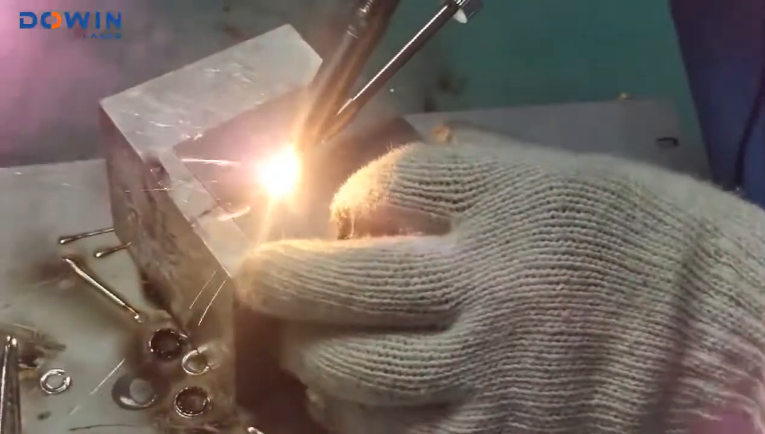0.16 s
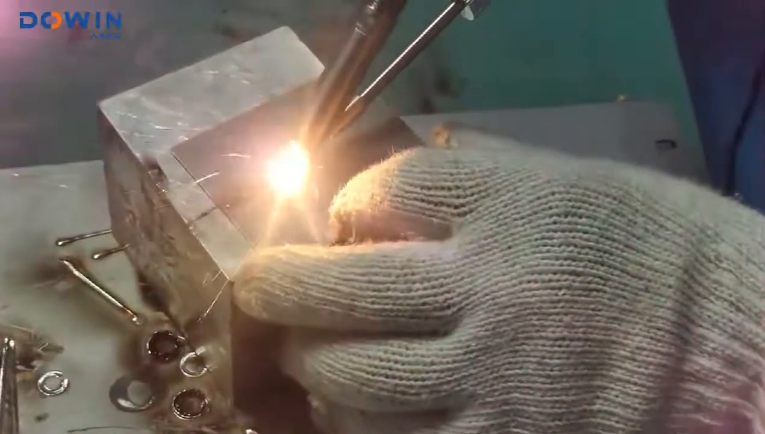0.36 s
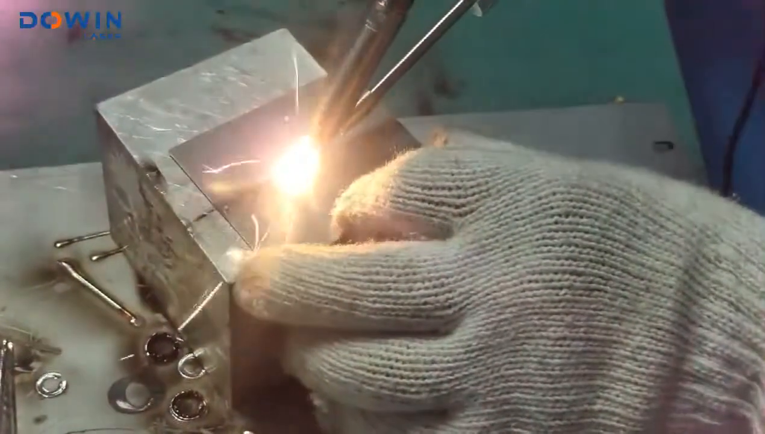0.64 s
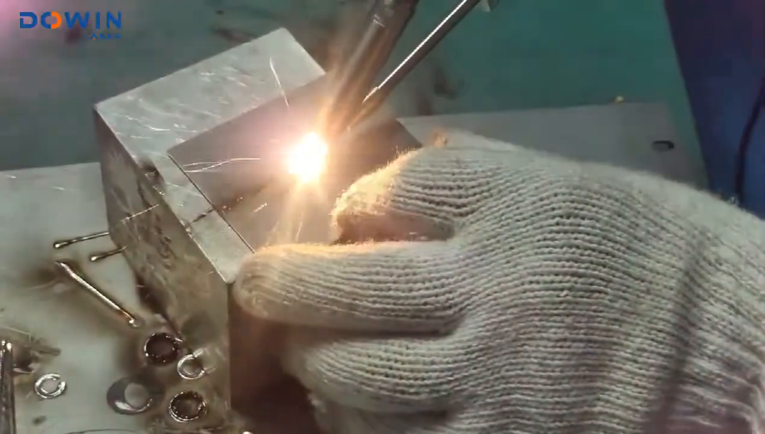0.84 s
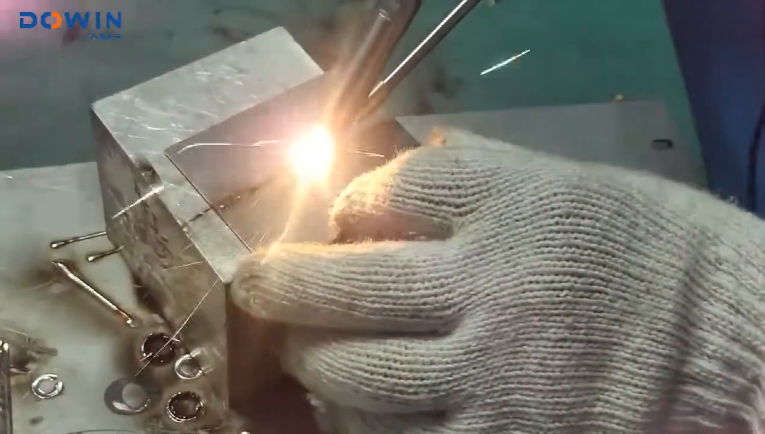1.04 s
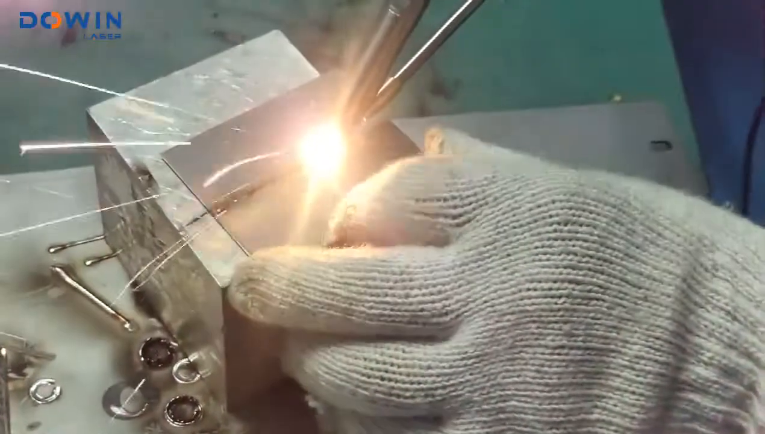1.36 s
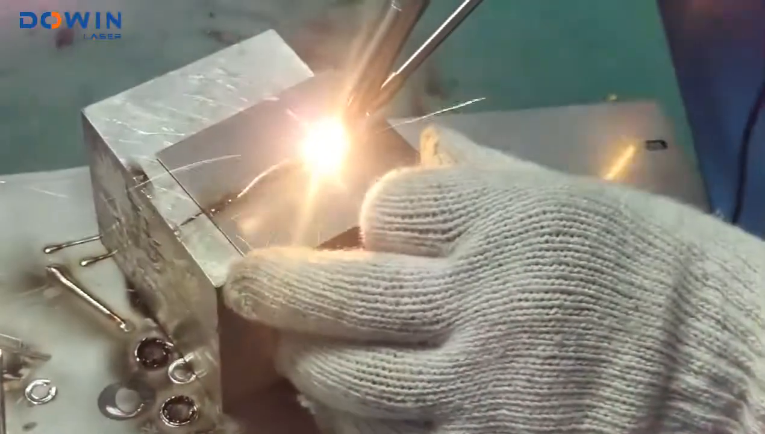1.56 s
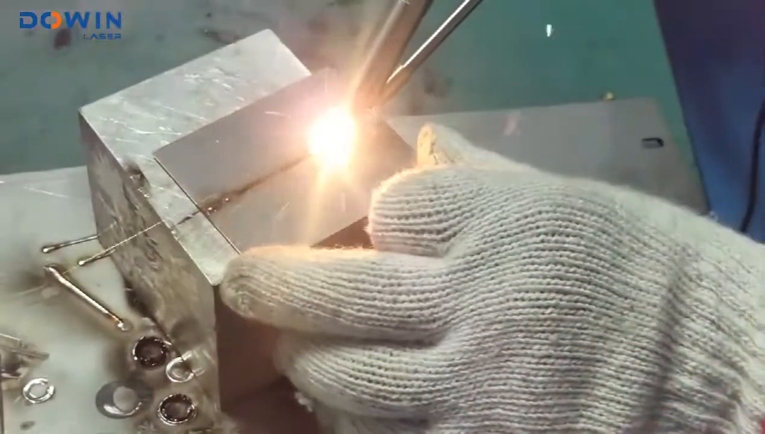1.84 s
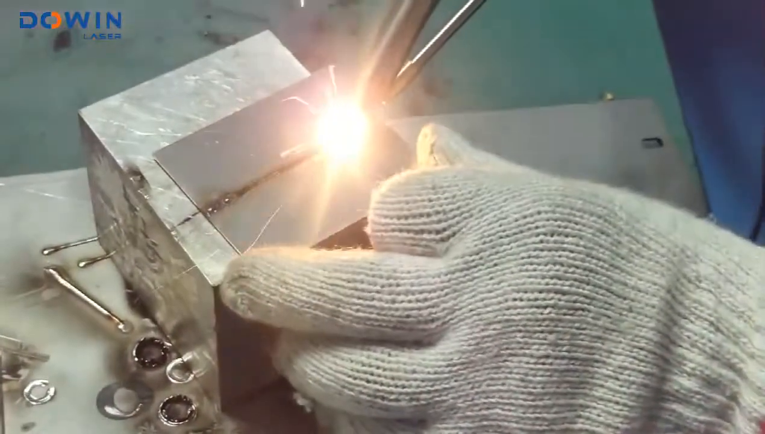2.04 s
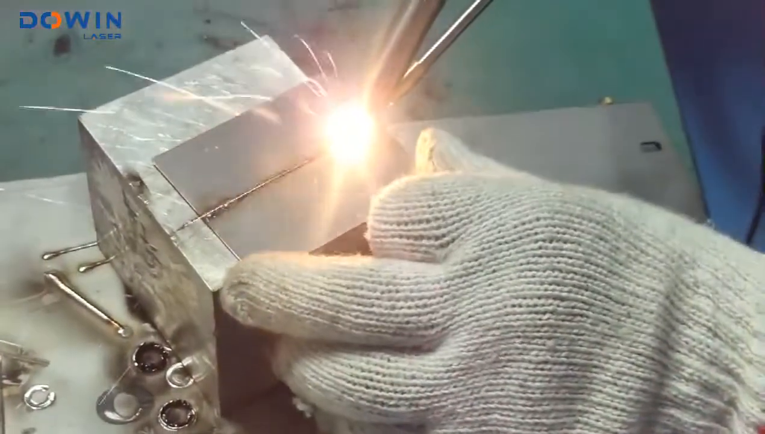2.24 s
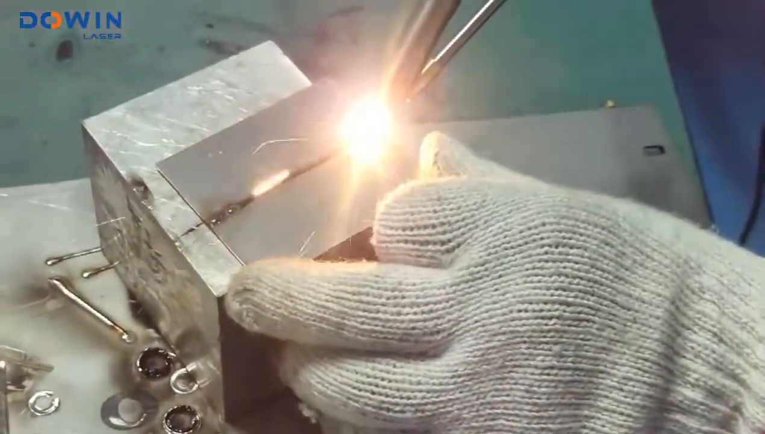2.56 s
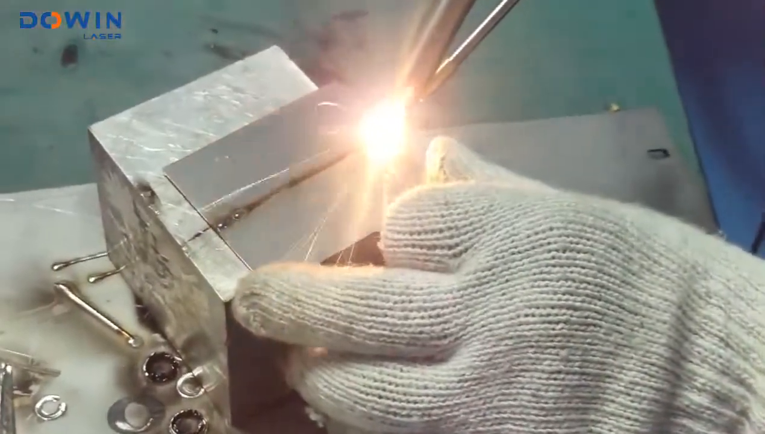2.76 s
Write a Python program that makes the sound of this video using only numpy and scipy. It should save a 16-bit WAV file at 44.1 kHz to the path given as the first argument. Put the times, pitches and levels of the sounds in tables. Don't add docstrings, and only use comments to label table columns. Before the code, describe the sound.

Handheld laser welder hisses fiercely with a rapid buzzing flutter along a steel seam in a workshop

```python
import sys
import numpy as np
from scipy import signal
from scipy.fft import rfft, irfft
from scipy.io import wavfile
from scipy.ndimage import uniform_filter1d

SR = 44100
rng = np.random.default_rng(int(sys.argv[2]) if len(sys.argv) > 2 else 0)


def dump(signal):
    limited = np.clip(np.atleast_2d(signal).T, -1, 1)
    pcm = np.round(limited * 32767).astype(np.int16)
    wavfile.write(sys.argv[1], SR, pcm)


def volts_from_decibels(level):
    exponent = np.asarray(level, float) / 20
    return 10 ** exponent


N = 127890

# frequency in Hz, level in dB per Hz.
FANS_MID = [(12, -60), (30, -23), (50, -14), (75, -4.5), (200, -3.5), (400, -7), (700, -13.5), (1500, -18)]
# frequency in Hz, level in dB per Hz.
FANS_SIDE = [(30, -21), (77, -6), (152, -12), (258, -4), (420, 16), (800, 17.5), (1500, 11)]
# multiple of 43.07 Hz, level in dB rms.
LOW_TONES = [(1, -62), (2, -43.5), (3, -47.5), (4, -51), (5, -62), (7, -53), (10, -57)]
# frequency in Hz, level in dB rms, left over right in dB.
WHINES = [(811, -61, 4), (902, -63, 4), (1311, -64, 5), (1690, -63, 0.5), (1968, -63, 2.2), (2492, -58, 6),
          (2576, -54, 6), (2740, -55, 2.2), (2902, -57, 4)]
# start in seconds, hiss level in dB, travel along seam 0-1, tilt 0-1.
TORCH = [(0, 1.8, 0, 0.13), (.3, 1.5, 0, 0.36), (.6, -.5, 0.32, .05), (.85, -1, 0.33, 0.3),
         (.95, -2, 0.54, 0.6), (1.1, -2, 0.63, 0.46), (1.21, -1, .6, 0.65), (1.3, -1, 0.75, 0.3),
         (1.45, -1.5, 0.57, 0.5), (1.57, 0.2, 0.52, 0.74), (1.9, 0.5, 0.82, 0.74), (2.03, 0, 1, 0.4),
         (2.13, 0, 0.85, 0.8), (2.2, 1.5, 0.93, 0.5), (2.28, .5, 0.8, 0.7), (2.4, 0.9, 0.98, 0.47),
         (2.74, -0.5, 0.9, 0.07), (2.9, -2.5, .85, 0)]
CROSSINGS = [
    (.27, 0.09, 2.5),
    (.53, 0.08, 3.4),
]
# frequency in Hz, pulsing share 0-1.
PULSING = [(1500, 0), (3000, 0), (4500, 0.67), (9000, 1), (15000, 0.78)]
# frequency in Hz, level in dB per Hz.
HISS_MID = [(400, -84.5), (1300, -81.5), (2500, -73.5), (4500, -73), (7000, -70.5), (9500, -73.5),
            (13000, -77), (15500, -77.5)]
# frequency in Hz, level in dB per Hz.
HISS_SIDE = [(400, -109), (1300, -78), (2500, -76), (4500, -70), (7000, -63.5), (9500, -67), (13000, -75),
             (15500, -80)]
# frequency in Hz, width in Hz, dB at seam start, dB at seam end.
BENCH_MID = [(1678, 43, 5.5, 5.5), (3100, 220, 3.5, -0.5), (3595, 75, 1.5, 2.5), (4170, 95, 2, 2),
             (3357, 127, -6.5, -4.5), (5120, 107, -1, 9), (6015, 157, 3.5, 10.5), (6736, 370, 6, 9.5),
             (7980, 333, 10, 0.5), (8540, 200, 2, 6), (9870, 270, 1.5, 2), (10690, 380, 4.5, 1.5),
             (12030, 160, 8.5, 4), (15600, 420, -1, 0)]
# frequency in Hz, width in Hz, dB at seam start, dB at seam end.
BENCH_SIDE = [(2660, 180, 7, 6), (3920, 200, 2, 3), (4300, 130, -2, -2.5), (5040, 180, -1, 0.5),
              (5780, 230, 5.5, 5.5), (6600, 200, 2, -4), (7250, 230, 5, 6), (8000, 350, 4.5, 2),
              (8750, 120, -3, -3), (9400, 350, 1.5, 2), (12200, 400, 0, 0), (13400, 250, 0, 2),
              (14200, 300, -4, 0), (15100, 400, 0, 5)]
# frequency in Hz, width in Hz, dB upright, dB tilted.
CANCEL = [(8900, 180, 5.5, -8.5), (10400, 680, 1, -4.5)]
# frequency in Hz, width in Hz, lean at seam start, at end.
LEAN = [(1200, 120, 0.7, 0.66), (2340, 390, 0.5, 0.76), (4700, 840, 0.46, 0.71), (6100, 360, 1, 0.69),
        (7000, 300, -0.2, -0.83), (7800, 250, -0.4, .2), (8500, 260, .4, 0.81), (12300, 300, 0.4, .45)]
# frequency in Hz, width in Hz, lag at seam start, at end.
TWIST = [(800, 250, .2, .2), (1400, 150, -.3, -.3), (3200, 600, -.45, -.45), (5300, 380, .4, .6),
         (6500, 300, .4, .6), (8060, 400, -.7, -.3), (8900, 300, -.2, .5), (10000, 900, -.7, 0.41),
         (12200, 600, -.6, -.35)]
# centre in seconds, half length in seconds, frequency in Hz,
# width in Hz, depth in dB.
DIPS = [(.32, .013, 9400, 200, -18), (.56, .015, 15300, 400, -22), (.735, .04, 14800, 280, -20),
        (.945, .04, 9350, 200, -18), (1.045, .03, 3700, 230, -20), (1.11, .018, 15200, 500, -18),
        (1.205, .02, 10100, 800, -20), (1.225, .035, 3750, 160, -18), (1.42, .013, 9900, 350, -18),
        (1.745, .01, 9900, 400, -18), (2.13, .015, 3500, 300, -14), (2.185, .012, 11400, 250, -16),
        (1.59, .045, 9700, 400, -18), (1.72, .2, 9350, 170, -16), (1.925, .02, 3800, 200, -16),
        (2.02, .01, 9800, 450, -18), (2.13, .042, 9950, 650, -20), (2.28, .05, 10450, 950, -22),
        (2.35, .035, 10200, 250, -16), (2.44, .035, 3900, 180, -20), (2.52, .045, 3400, 130, -16),
        (2.6, .045, 4050, 120, -14), (2.65, .22, 10100, 180, -12), (2.67, .012, 15200, 500, -16),
        (2.2, .7, 15650, 300, -14), (2.845, .028, 12000, 200, -16)]


def evened(x):
    return x / np.sqrt(np.mean(x ** 2) + 1e-20)


def read(points, hz):
    f, value = np.transpose(points)
    return np.interp(np.log(hz + 1), np.log(f + 1), value)


def bumps(rows, hz, position):
    total = 0
    for centre, width, first, last in rows:
        bell = np.exp(-.5 * ((hz[:, None] - centre) / width) ** 2)
        total = total + bell * (first + (last - first) * position)
    return total


def drift(t, top_hz):
    rates = .5 * (2 * top_hz) ** np.linspace(0, 1, 24)
    starts = rng.random(24)
    return evened(sum(np.sin(2 * np.pi * (f * t + p)) / np.sqrt(f) for f, p in zip(rates, starts)))


def pair(size, lean, patchy_db):
    a, b, c, d, patch = rng.standard_normal((4 * N // size + 5, size // 2 + 1, 5)).T
    patch = uniform_filter1d(patch, size=5, axis=0)
    patch = evened(uniform_filter1d(patch, size=20, axis=1))
    most_alike = 0.97
    lean = lean / np.maximum(abs(lean) / most_alike, 1)
    shared = a + 1j * b
    difference = lean * shared + np.sqrt(1 - abs(lean) ** 2) * (c + 1j * d)
    return np.array([shared, difference]) * volts_from_decibels(patchy_db * patch)


def unfold(z, size):
    return signal.istft(z, nperseg=size, noverlap=3 * size // 4)[1][:, :N]


def fans():
    size = 2048
    hz = np.fft.rfftfreq(size, 1 / SR)
    shape = volts_from_decibels([read(FANS_MID, hz), read(FANS_SIDE, hz)]) / (1 + (hz / 2300) ** 2) ** 2
    mid, side = unfold(pair(size, lean=0.31, patchy_db=1.4) * shape[:, :, None], size)
    mid_db, side_db = -39, -47.5
    return np.array([volts_from_decibels(mid_db) * evened(mid), volts_from_decibels(side_db) * evened(side)])


def tone(hz, db, waver_db):
    t = np.arange(N) / SR
    coarse = t[::400]
    slow = np.interp(t, coarse, drift(coarse, top_hz=12))
    return np.sqrt(2) * volts_from_decibels(db + waver_db * slow) * np.sin(2 * np.pi * (hz * t + rng.random()))


def low_tones():
    base_hz = 43.07
    return sum(tone(k * base_hz, db, waver_db=1.3) for k, db in LOW_TONES)


def whines():
    total = np.zeros((2, N))
    for hz, db, pan_db in WHINES:
        total += tone(hz, db - 2.5, waver_db=4.5) * volts_from_decibels(np.array([[0], [-pan_db]]))
    return total


def dips(hz, t):
    total = 0
    for s, half, f, width, db in DIPS:
        band = ((hz[:, None] - f) / width) ** 4
        moment = ((t - s) / half) ** 4
        total = total + db * np.exp(-.5 * band - .5 * moment)
    return total


def flares():
    swing_hz = 81.97
    turns = np.arange(N) / SR * swing_hz
    power = np.ones(N)
    for place, width, rise in CROSSINGS:
        force_db = np.tanh(rng.standard_normal(int(turns[-1]) + 1))
        strength = volts_from_decibels(force_db)[turns.astype(int)]
        power += rise * strength * np.exp(-.5 * ((turns % 1 - place) / width) ** 2)
    return evened(np.sqrt(power))


def weld():
    size, hop, hiss_db = 512, 128, 21.5
    hz = np.fft.rfftfreq(size, 1 / SR)
    t = np.arange(N // hop + 5) * hop / SR
    s, level_db, travel, tilt = np.transpose(TORCH)
    travel, tilt = np.interp(t, s, travel), np.interp(t, s, tilt)

    mid_db = read(HISS_MID, hz)[:, None] + bumps(BENCH_MID, hz, travel)
    mid_db = mid_db + bumps(CANCEL, hz, tilt) + dips(hz, t)
    side_db = read(HISS_SIDE, hz)[:, None] + bumps(BENCH_SIDE, hz, travel)

    share = read(PULSING, hz)[:, None]
    swell_db = share * (np.interp(t, s, level_db) + 0.37 * drift(t, top_hz=25.2))
    follows = np.array([1, 0.55])[:, None, None]
    level = volts_from_decibels(np.array([mid_db, side_db]) + hiss_db + follows * swell_db)

    likeness = bumps(LEAN, hz, travel) + 1j * bumps(TWIST, hz, travel)
    z = pair(size, likeness, patchy_db=1.35) * level
    return unfold(z * (1 - share), size) + flares() * unfold(z * share, size)


def scene():
    mid, side = fans() + weld()
    return np.array([mid + side, mid - side]) + low_tones() + whines()


def low_pass(x):
    return signal.sosfilt(signal.butter(12, 15640, fs=SR, output="sos"), x)


def record(dry):
    edges_hz = (15580, 15350)
    edge = np.array([signal.firwin(511, hz, window=("kaiser", 9), fs=SR) for hz in edges_hz])
    parts = np.array([dry[0] + dry[1], dry[0] - dry[1]]) / 2
    mid, side = signal.oaconvolve(parts, edge, "same", axes=1)

    null_hz, null_width_hz, depth_db = 4040, 100, -36
    hz = np.fft.rfftfreq(N, 1 / SR)
    null_db = depth_db * np.exp(-.5 * ((hz - null_hz) / null_width_hz) ** 2)
    nulled = irfft(rfft(mid) * volts_from_decibels(null_db), N)
    fill = np.interp(np.arange(N) / SR, (1.9, 2.0), (0, .5))
    mid = fill * mid + (1 - fill) * nulled
    return low_pass(np.array([mid + side, mid - side]))


dry = scene()
out = record(dry)
dump(out)
```